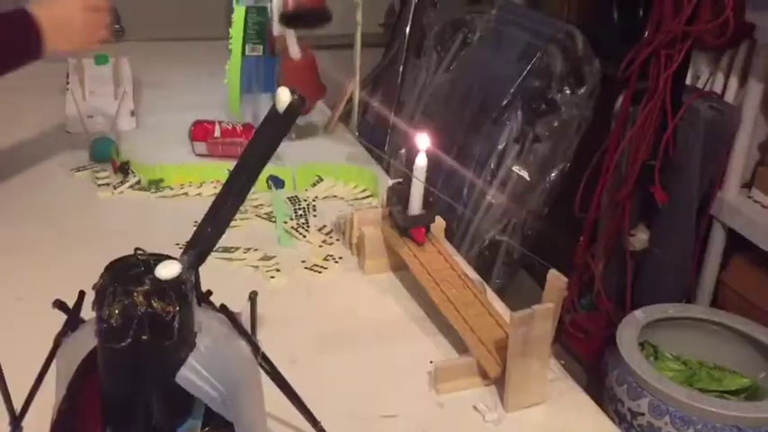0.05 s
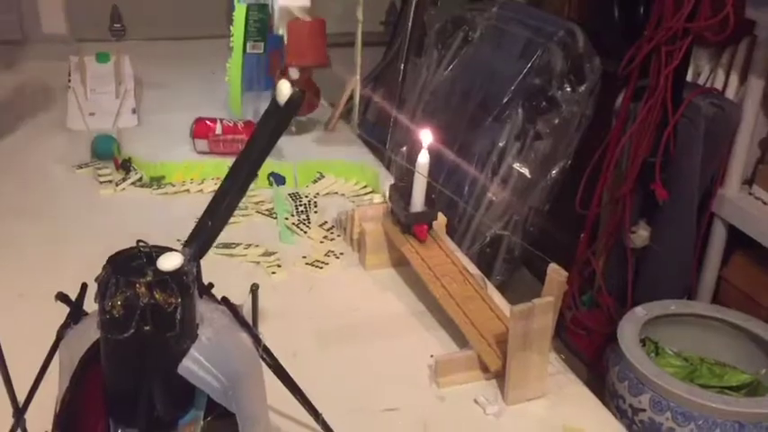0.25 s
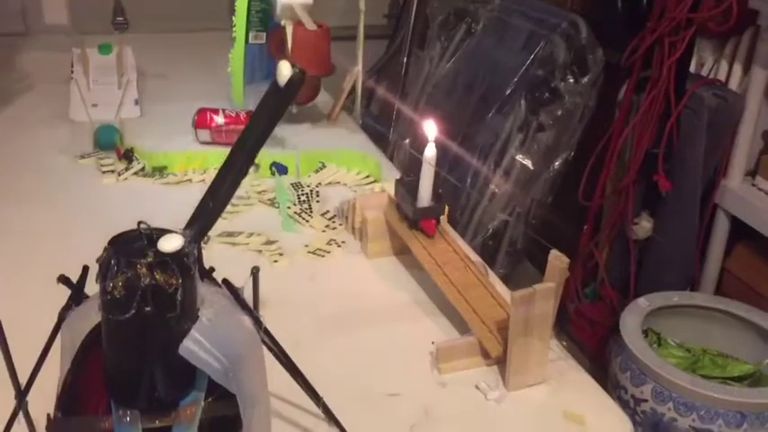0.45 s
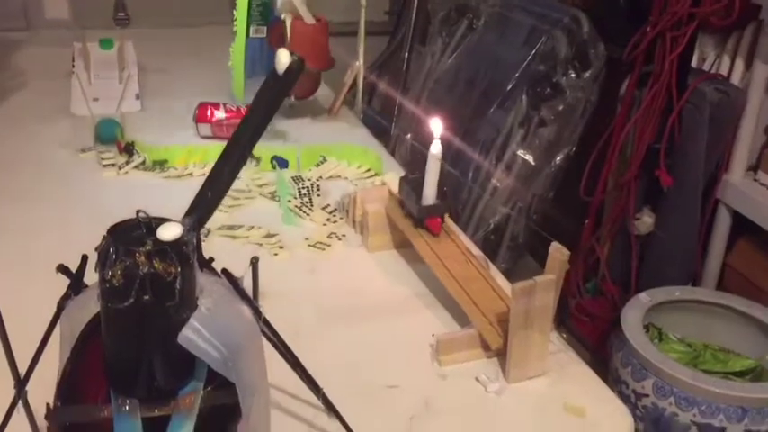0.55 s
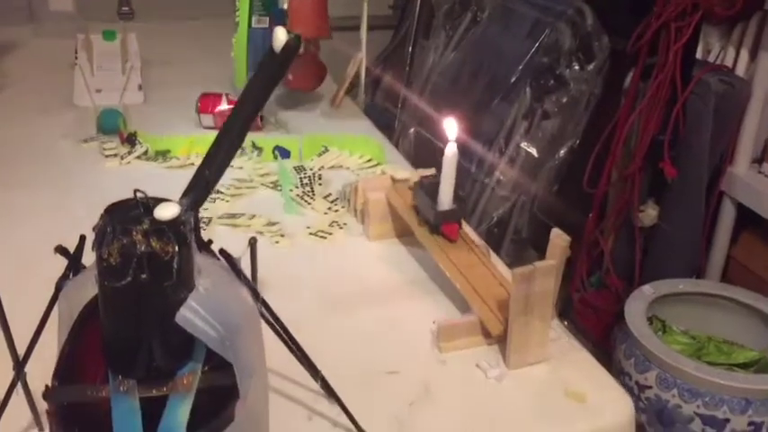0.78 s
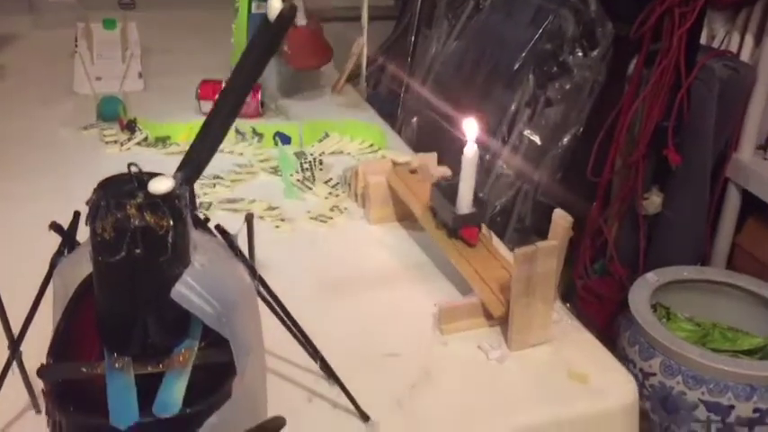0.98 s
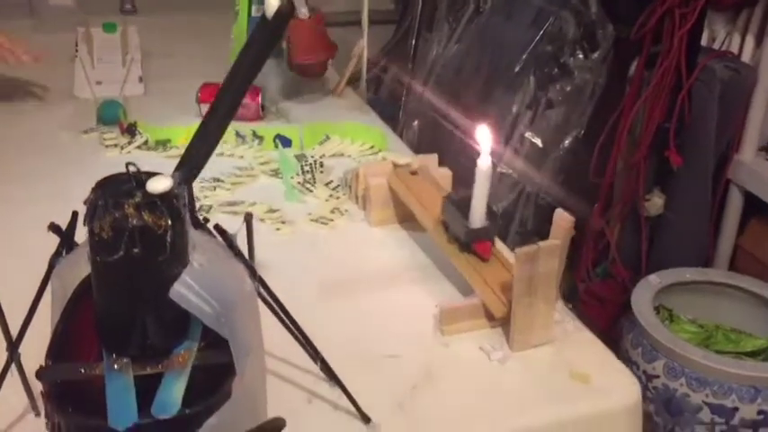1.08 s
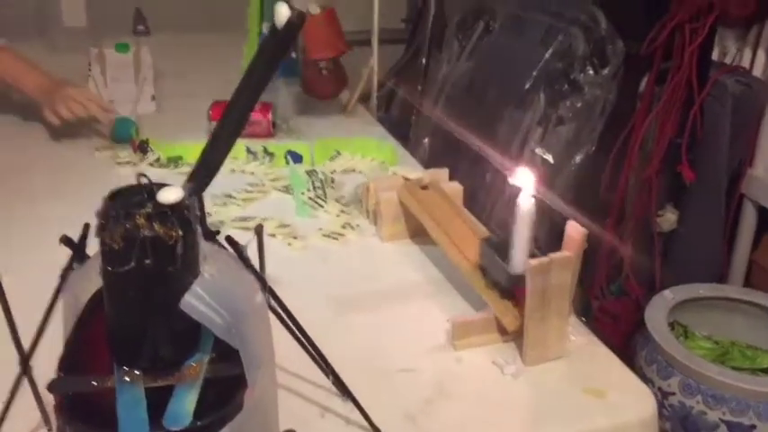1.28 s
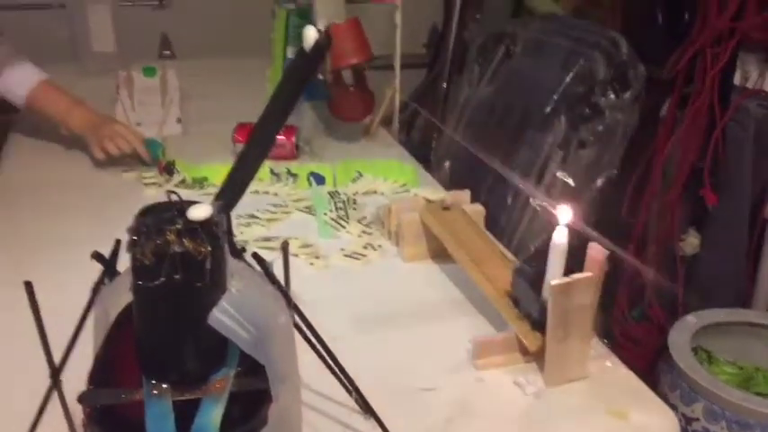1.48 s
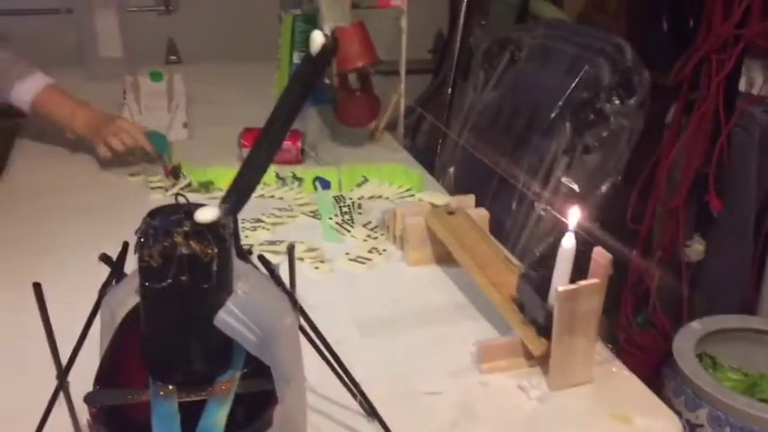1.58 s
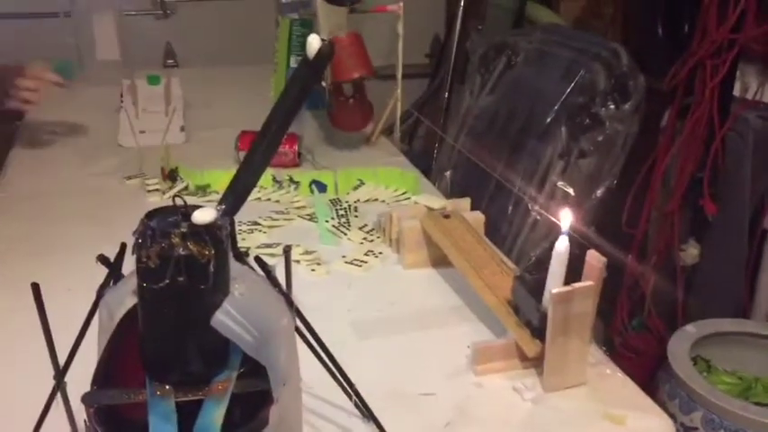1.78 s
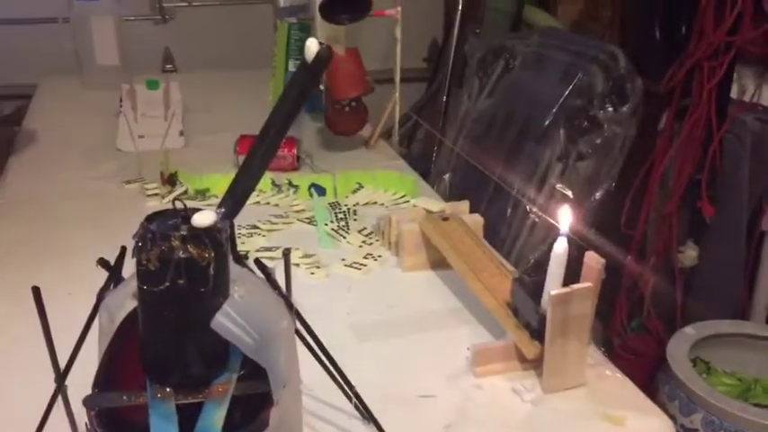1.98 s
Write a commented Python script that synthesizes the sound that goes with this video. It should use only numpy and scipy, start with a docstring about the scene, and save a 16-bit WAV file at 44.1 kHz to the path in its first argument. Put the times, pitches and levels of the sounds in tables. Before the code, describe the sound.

A tabletop chain-reaction machine knocks and clatters: a little metal part jingles, a weight lands and bounces, and a hard piece clacks down. A small cart then rattles down a wooden ramp into a stop, heard nearby in a quiet room.

```python
"""Tabletop chain-reaction machine

Heard from beside the table in a small, quiet room. A little metal part jingles, a weight knocks on the
table and bounces, a hard piece clacks down. A small cart then rattles down a wooden ramp and runs into
the end stop. Light ticks and soft thuds fall around them; the walls answer every contact."""
import sys
import numpy as np
from scipy import signal
from scipy.fft import rfft, irfft
from scipy.io import wavfile

SR = 44100
rng = np.random.default_rng(int(sys.argv[2]) if len(sys.argv) > 2 else 0)


def put_to_file(sound):
    """Save the sound as 16-bit audio at rate SR, in the file named by the first command-line argument."""
    columns = np.atleast_2d(sound).T  # one column per channel
    safe = np.clip(columns, -1, 1)
    whole_steps = np.round(safe * 32767)
    wavfile.write(sys.argv[1], SR, whole_steps.astype(np.int16))


N = 90404
SIZE = 18432  # samples for one contact and its tail
RAMP_RING_DB, RAMP_LAG_S = -30.5, .004

# Modes of the table and of the ramp. Each row: pitch in Hz, relative level in dB, T60 in seconds.
TABLE_MODES = [(419, -1, 0.3), (545, -10, .25), (691, -4, .25), (782, -10, .25), (835, -17, .25),
               (902, -4, 0.16), (998, -0.5, .22), (1061, -2, .2), (1174, -3.5, .22), (1220, -7, .2),
               (1376, -3, 0.16), (1530, -3, .22), (1584, 0, .22), (1940, 1, .22)]
RAMP_MODES = [(161, -5, .3), (224, -6, 0.12), (371, -4.5, 0.21), (547, -3, 0.18), (1570, 0.5, .12),
              (1859.5, 3, .12), (2355, -1.5, .1), (2725, 1, .1)]
# Broad resonances of the ramp. Each row: centre in Hz, width in Hz, boost in dB.
RAMP_BODY = [(1454, 90, 3.1), (1820, 330, 5), (2490, 130, 6.2), (2753, 110, 5), (3550, 160, 7.5),
             (5200, 230, 4)]


def undb(db):
    """Decibels to gain."""
    return 10 ** (np.asarray(db) / 20)


def unit(x):
    """Scale to rms 1."""
    return x / np.sqrt(np.mean(x ** 2))


def read(points, hz):
    """Read (Hz, value) points on a log-frequency axis."""
    f, value = np.array(points).T
    return np.interp(np.log(np.maximum(hz, 1)), np.log(f), value)


def waver(centre_hz, width_hz):
    """A resonance kept going by random pushes, rms 1."""
    hz = np.fft.rfftfreq(N, 1 / SR)
    resonance = 1 / (1 + (2 * (hz - centre_hz) / width_hz) ** 2)
    tone = signal.hilbert(irfft(rfft(rng.standard_normal(N)) * resonance, N))
    return unit(tone.real / np.sqrt(np.abs(tone)))  # evens out the swells


def pulse(colour, tilt_db=0, body=(), lag_s=0):
    """One blow, tilted above 1 kHz. Bending waves take lag_s to arrive at 1 kHz, longer in the lows."""
    hz = np.fft.rfftfreq(SIZE, 1 / SR)
    db = read(colour, hz) + tilt_db * np.log2(np.maximum(hz / 1000, 1))
    db += sum(boost / (1 + (2 * (hz - f) / width) ** 2) for f, width, boost in body)
    cepstrum = irfft(np.log(undb(db)))[:SIZE // 2]
    minimum_phase = np.exp(rfft(2 * cepstrum * (np.arange(SIZE // 2) > 0), SIZE))
    bending = np.exp(-4j * np.pi * lag_s * np.sqrt(1000 * hz))
    return irfft(minimum_phase * bending)[:SIZE // 8] / np.abs(irfft(minimum_phase)).max()


def room(room_db):
    """From one spot to the microphone: direct sound with a brief buzz, near echoes, then the walls."""
    # Decay of the room. Each row: frequency in Hz, T60 in seconds.
    decay = [(100, 0.3), (260, 0.4941), (700, 0.25), (1840, 0.2737), (4200, 0.243), (7500, 0.23),
             (12800, 0.22)]
    chatter_hz, first_echo_s, build_s, near_db = 3000, .0011, .0028, 2.5
    t, hz = np.arange(SIZE) / SR, np.fft.rfftfreq(SIZE, 1 / SR)
    fade = lambda t60: np.exp(-np.log(1000) * t / t60)
    split = lambda x, side: signal.sosfilt(signal.butter(2, chatter_hz, side, fs=SR, output="sos"), x)
    band = lambda centre: read([(f, f == centre) for f, _ in decay], hz)
    chatter = rng.standard_normal(SIZE) * fade(t60=.0065)
    direct = split(1. * (t == 0), "low") + split(chatter / np.linalg.norm(chatter), "high")
    echoes = rfft(rng.standard_normal(SIZE) * undb(-rng.standard_normal(SIZE)))  # 1 dB spread
    tail = sum(irfft(echoes * band(centre)) * fade(t60) for centre, t60 in decay)
    tail *= np.clip((t - first_echo_s) / build_s, 0, 1)
    tail *= 1 + undb(near_db) * fade(t60=.04)
    return direct + undb(room_db) * tail / np.linalg.norm(tail)


def contacts(hits, colour, modes=(), ring_db=0, body=(), lag_s=0):
    """Each contact sends a pulse into the room and sets any modes of its object ringing."""
    t = np.arange(SIZE) / SR
    ringing = sum(undb(db) * np.sin(2 * np.pi * hz * t) * np.exp(-np.log(1000) * t / t60)
                  for hz, db, t60 in modes)
    out = np.zeros(N)
    for start_s, db, tilt_db, room_db in hits:
        blow = signal.fftconvolve(room(room_db), pulse(colour, tilt_db, body, lag_s))[:SIZE]
        start = int(start_s * SR)
        out[start:start + SIZE] += undb(db) * (blow + undb(ring_db) * ringing)[:N - start]
    return out


def room_tone():
    """Low room rumble with faint hiss and a wavering hum."""
    # Spectrum of the quiet room. Each row: frequency in Hz, relative level in dB.
    colour = [(15, -55), (25, -27.5), (48, -5), (92, -11), (157, -4), (217, -10.5), (363, -17.5),
              (394, -21), (489, -14.5), (531, -22.5), (677, -23), (1260, -26.5), (3520, -34.5), (3920, -35),
              (16000, -47)]
    hz = np.fft.rfftfreq(N, 1 / SR)
    air = irfft(rfft(rng.standard_normal(N)) * undb(read(colour, hz)), N)
    return undb(-63) * unit(air) + undb(-68) * waver(centre_hz=163, width_hz=12)


def table_thuds():
    """Soft, low blows on the table, heard mostly by way of the walls. Two of them land together with the heavy
    knock and the first clack and give those their low body."""
    # Each row: start in seconds, level in dB, tilt in dB per octave, room send in dB.
    hits = [(0.09, -49.5, 0, 9.5), (0.2165, -30.5, -0.5, 8), (0.413, -43, 0, 4), (0.845, -53, -2, 11),
            (1.687, -55.5, 1, 11), (1.95, -49.5, 0.5, 8), (1.985, -64, 2, 5.5)]
    # Spectrum of a thud. Each row: frequency in Hz, relative level in dB.
    colour = [(40, -17), (120, -2.5), (250, -5.5), (420, -13.5), (800, -23), (3000, -25.5), (12000, -43)]
    return contacts(hits, colour)


def loose_ticks():
    """Loose parts touch lightly, with more room than direct sound."""
    # Each row: start in seconds, level in dB, tilt in dB per octave, room send in dB.
    hits = [(0.636, -63, 0.5, 13.5), (0.7852, -51.5, 0.5, 12), (0.7996, -43.5, 2.5, 10),
            (0.8215, -38.5, -3.5, 6.5), (0.8989, -54.5, 4.5, 9), (1.593, -46, 29, 6), (1.8638, -40, 5, 6)]
    # Spectrum of a tick. Each row: frequency in Hz, relative level in dB.
    colour = [(100, -15.5), (700, -19.5), (1300, -12), (2000, -6.5), (3700, 1.5), (4500, 0), (5500, 1),
              (7500, -10), (11000, -16.5), (16000, -27.5)]
    return contacts(hits, colour)


def metal_jingle():
    """Quick, light contacts keep a little metal part ringing high."""
    # Each row: start in seconds, level in dB, tilt in dB per octave, room send in dB.
    hits = [(0.001, -33, -2, 5), (0.0755, -24.5, 2, 2.5), (0.0795, -28.5, 3.5, 0.5), (0.082, -29.5, -2, 2),
            (0.0895, -29.5, -3, 7.5), (0.0963, -31, 0.5, 8.5), (0.1115, -29.5, -0.5, 4.5),
            (0.1462, -32.5, -2.5, 11), (0.1642, -27, 2.5, 0.5), (0.185, -41, -0.5, 1)]
    # Spectrum of a contact. Each row: frequency in Hz, relative level in dB.
    colour = [(100, -27.5), (600, -15.5), (1800, -30), (3500, -20.5), (5500, -17), (6450, -1.5),
              (7300, -13.5), (7900, -9.5), (9500, -22), (13500, -31.5), (14800, -20), (16000, -38.5)]
    # Modes of the metal. Each row: pitch in Hz, relative level in dB, T60 in seconds.
    modes = [(6433, 1, .26), (6560, -8.5, .25), (6915, -12, 0.25), (7811, -13.5, 0.069), (14800, -10.5, .1)]
    return contacts(hits, colour, modes, ring_db=-19)


def cart_rolling():
    """Dense little bumps under the wheels drum on the ramp, and its low modes swell in turn."""
    # Strength of the rolling. Each row: time in seconds, level in dB.
    levels = [(0.78, -68), (0.84, -70.5), (0.98, -69), (1.05, -50.5), (1.14, -61), (1.23, -51.5),
              (1.3, -49), (1.35, -53), (1.399, -45), (1.48, -42), (1.531, -51), (1.59, -78)]
    # Spectrum of a bump. Each row: frequency in Hz, relative level in dB.
    colour = [(40, -24.5), (100, 3), (160, 2.5), (300, -1.5), (410, 4), (560, -3.5), (800, -7), (1200, 0.5),
              (1900, -5), (2800, -7), (4500, -20.5), (6500, -38), (10000, -37), (16000, -38.5)]
    # Ramp modes drone as the cart passes their places.
    # Each row: peak time in seconds, half-length in seconds, pitch in Hz, level in dB.
    swells = [(0.881, 0.046, 249, -60), (1.061, 0.063, 206.5, -59.5), (1.193, 0.071, 152, -59.5),
              (1.295, .05, 224, -51), (1.442, 0.045, 161, -49.5), (1.412, 0.043, 398.5, -48.5),
              (1.471, 0.06, 434, -48.5), (1.595, 0.046, 218, -61)]
    bumps_per_s, spread_db = 450, 3.5
    t = np.arange(N) / SR
    bumps = (rng.random(N) < bumps_per_s / SR) * rng.choice([-1, 1], N)
    bumps = bumps * undb(spread_db * rng.standard_normal(N))
    path = signal.fftconvolve(room(room_db=-.5), pulse(colour, body=RAMP_BODY, lag_s=RAMP_LAG_S))
    times, db = np.array(levels).T
    force = unit(bumps) * undb(np.interp(t, times, db)) * (t > times[0]) * (t < times[-1])
    drone = sum(undb(level) * np.exp(-((t - peak_s) / half_s) ** 2) * waver(hz, width_hz=22)
                for peak_s, half_s, hz, level in swells)
    return signal.fftconvolve(force, path / np.linalg.norm(path))[:N] + drone


def ramp_jolts():
    """The ramp and its cart jolt and rattle, and the wood rings."""
    # Each row: start in seconds, level in dB, tilt in dB per octave, room send in dB.
    hits = [(0.001, -42, -5, 6.5), (0.1925, -17.5, 5, 0), (0.2008, -28.5, 0.5, 0.5), (1.0062, -43.5, -1, 6),
            (1.0162, -29.5, -1, -0.5), (1.022, -30.5, -9.5, -2), (1.1203, -39.5, -16, -2),
            (1.1615, -27, 0, 2.5), (1.2, -45, -7, -3), (1.222, -44, 3.5, 0), (1.266, -33.5, -5.5, 7.5),
            (1.285, -27.5, -4.5, 1), (1.293, -25, -6.5, -1.5), (1.301, -30.5, -3.5, -0.5),
            (1.326, -37, 0, 3), (1.3705, -33.5, -3, 10.5), (1.379, -39, -1.5, 2), (1.384, -29, -2.5, 3),
            (1.425, -38.5, 6.5, 5), (1.5145, -24.5, -0.5, -0.5)]
    # Spectrum of a jolt. Each row: frequency in Hz, relative level in dB.
    colour = [(60, -17.5), (200, -7), (750, -17.5), (1200, -6), (1900, -2), (2800, -2.5), (3600, -7.5),
              (4800, -13.5), (6300, -9.5), (8000, -21), (10000, -33.5), (16000, -42)]
    return contacts(hits, colour, RAMP_MODES, RAMP_RING_DB, RAMP_BODY, RAMP_LAG_S)


def end_stop():
    """The cart hits the stop in a quick cluster of blows that ring the ramp."""
    # Each row: start in seconds, level in dB, tilt in dB per octave, room send in dB.
    hits = [(1.4465, -18, 3, -2.5), (1.4597, -35, 0, -3), (1.4692, -18.5, -2, -2.5),
            (1.4728, -21, -0.5, -8)]
    # Spectrum of a blow. Each row: frequency in Hz, relative level in dB.
    colour = [(60, -10), (200, -32), (400, -10.5), (600, 3), (750, -1.5), (950, -0.5), (1400, -1),
              (2000, -1.5), (2750, -1), (3150, -9.5), (3550, 2), (4700, -8), (6100, -2), (7500, -12.5),
              (10000, -26), (12000, -20.5), (13300, -28), (15000, -32)]
    return contacts(hits, colour, RAMP_MODES, RAMP_RING_DB, lag_s=.001488)


def hard_clacks():
    """A hard piece clatters down, and the table rings faintly under it."""
    # Each row: start in seconds, level in dB, tilt in dB per octave, room send in dB.
    hits = [(0.4115, -7.5, 1, 0), (0.4152, -15, 0.5, -1), (0.4176, -16, 0.5, -2.5), (0.431, -16, -2, 5),
            (0.4612, -16.5, -1, 0.5)]
    # Spectrum of a clack. Each row: frequency in Hz, relative level in dB.
    colour = [(40, -41), (160, -4), (300, -14.5), (650, -5), (1000, -6), (1600, -2.5), (2100, -1.5),
              (3000, -6.5), (4600, -14), (5800, -15.5), (7500, -21), (11000, -21), (16000, -32.5)]
    # Resonances of the struck parts. Each row: centre in Hz, width in Hz, boost in dB.
    body = [(1000, 150, 9.4), (1453, 90, 11), (2075, 170, 4.7), (2540, 52, 2.5), (5830, 1400, 7.2),
            (8500, 255, 5)]
    return contacts(hits, colour, TABLE_MODES, ring_db=-36, body=body, lag_s=.00124)


def weight_knocks():
    """A weight lands heavily and bounces, setting the tabletop ringing."""
    # Each row: start in seconds, level in dB, tilt in dB per octave, room send in dB.
    hits = [(0.1452, -32, -2.5, 8), (0.2156, -2.5, -1, 3), (0.2345, -19.5, 3, -7.5),
            (0.2688, -12.5, -1, -1.5), (0.4815, -21.5, -3, -5.5)]
    # Spectrum of a knock. Each row: frequency in Hz, relative level in dB.
    colour = [(30, -39.5), (110, -19.5), (240, -21.5), (450, -8), (700, -12), (1000, -1.5), (1400, -2.5),
              (1900, -9), (2300, -15), (3300, -14), (3900, -21), (6800, -22), (10000, -33), (16000, -43)]
    # Resonances of the struck parts. Each row: centre in Hz, width in Hz, boost in dB.
    body = [(1131, 260, 0.5), (1857, 110, 4), (2510, 130, 4.5), (3300, 340, 4.5), (4090, 120, 8),
            (6570, 230, 4), (8100, 200, 3), (11100, 250, 7.5)]
    return contacts(hits, colour, TABLE_MODES, ring_db=-28, body=body, lag_s=.0012)


def scene():
    """The whole machine over the room tone, at one microphone."""
    strikes = weight_knocks() + hard_clacks() + metal_jingle() + ramp_jolts() + end_stop()
    return (strikes + loose_ticks() + table_thuds() + cart_rolling() + room_tone())[None]


def record(dry):
    """The recorder cuts the deepest bass and the top."""
    low_cut_hz, top_hz = 45, 15900
    thin = signal.sosfilt(signal.butter(3, low_cut_hz, "high", fs=SR, output="sos"), dry)
    return signal.sosfilt(signal.ellip(10, .2, 70, top_hz, fs=SR, output="sos"), thin)


dry = scene()
out = record(dry)
put_to_file(out)
```